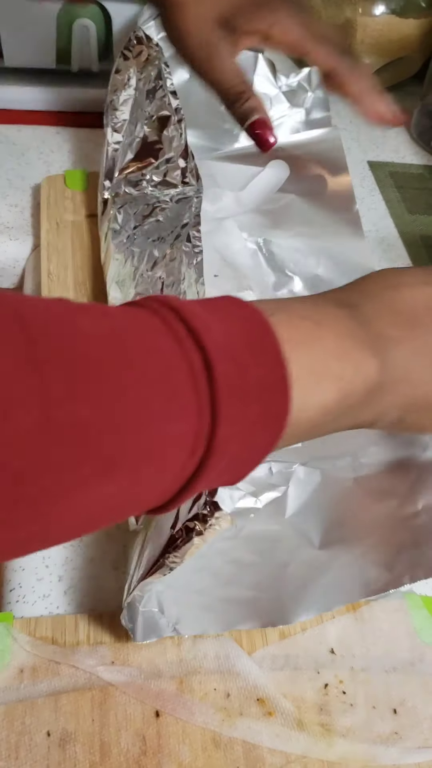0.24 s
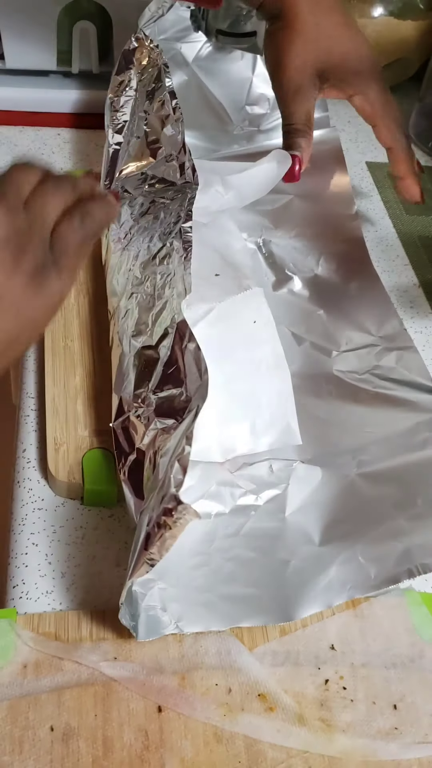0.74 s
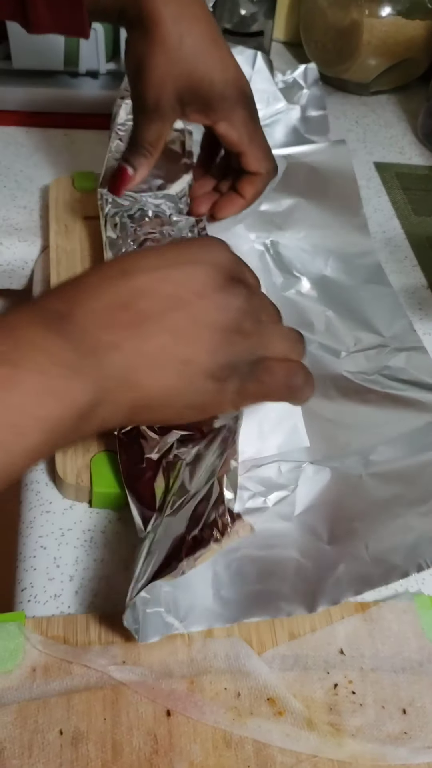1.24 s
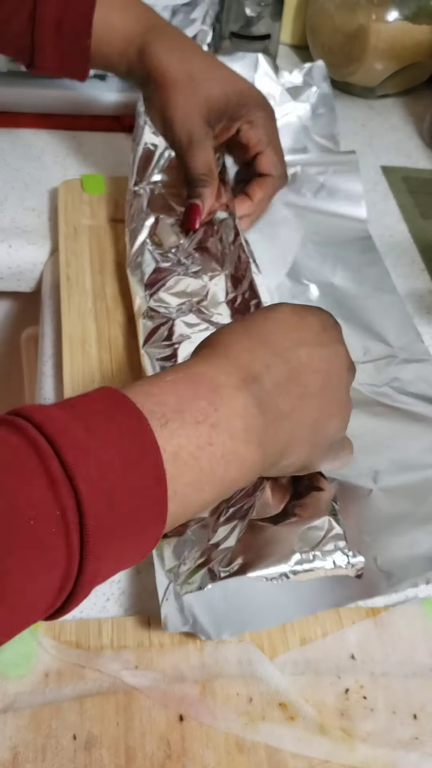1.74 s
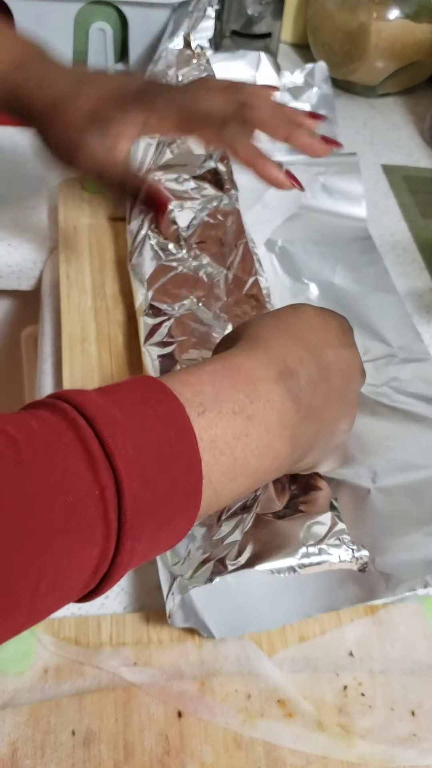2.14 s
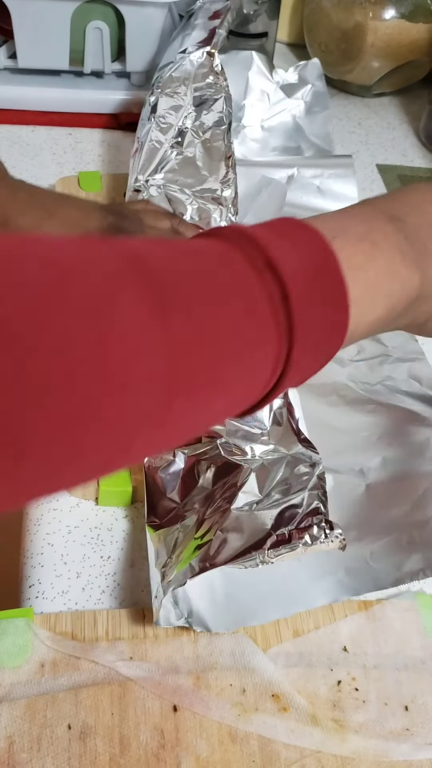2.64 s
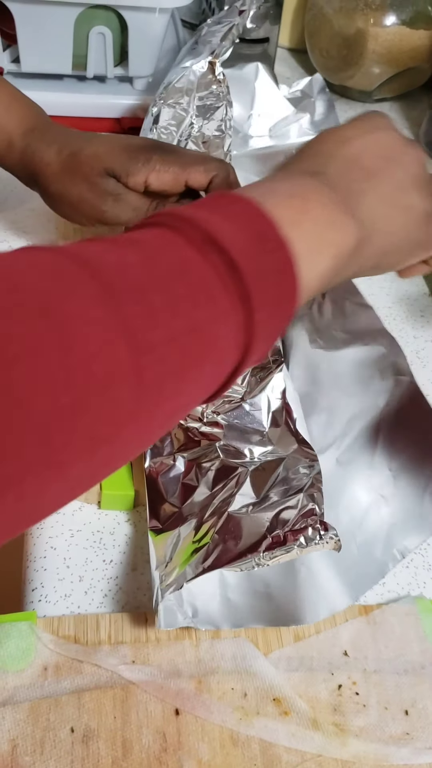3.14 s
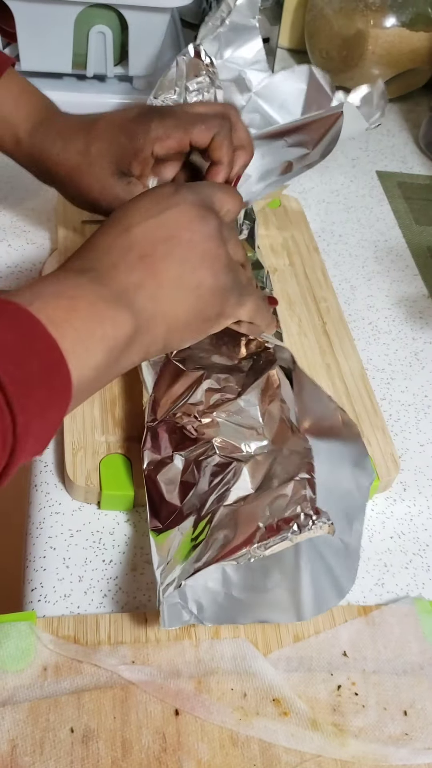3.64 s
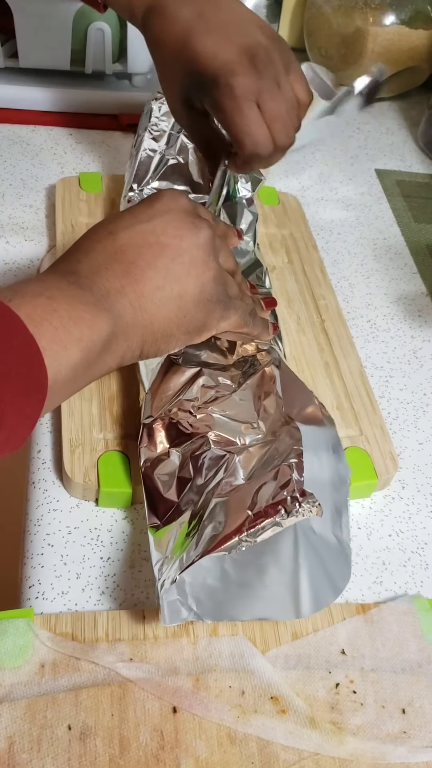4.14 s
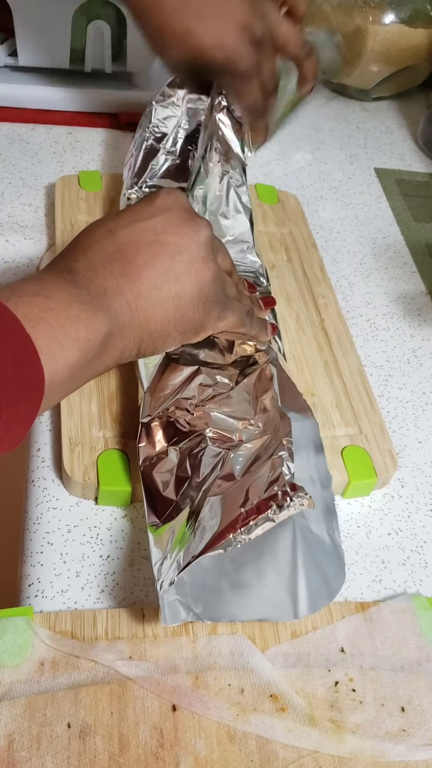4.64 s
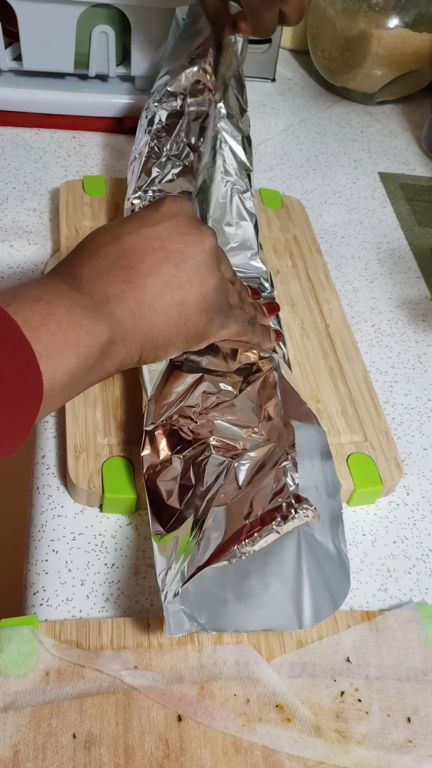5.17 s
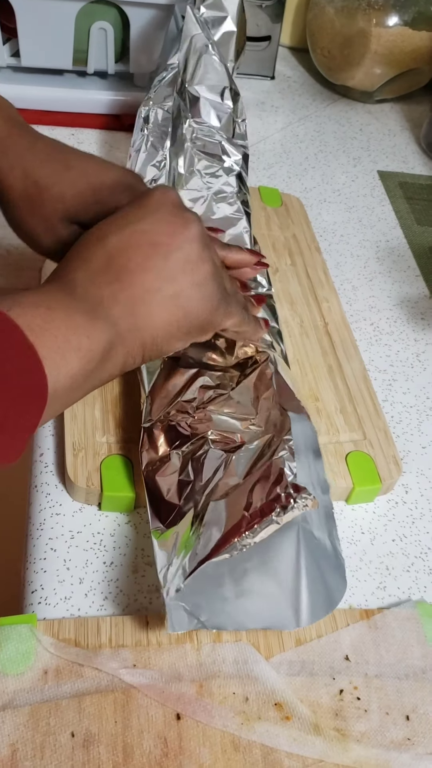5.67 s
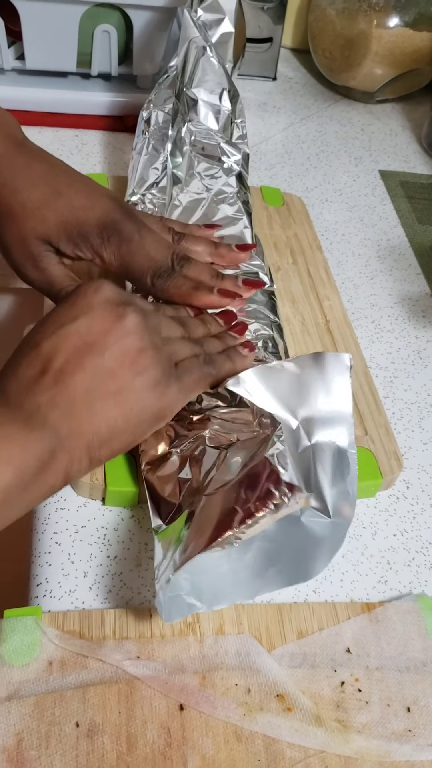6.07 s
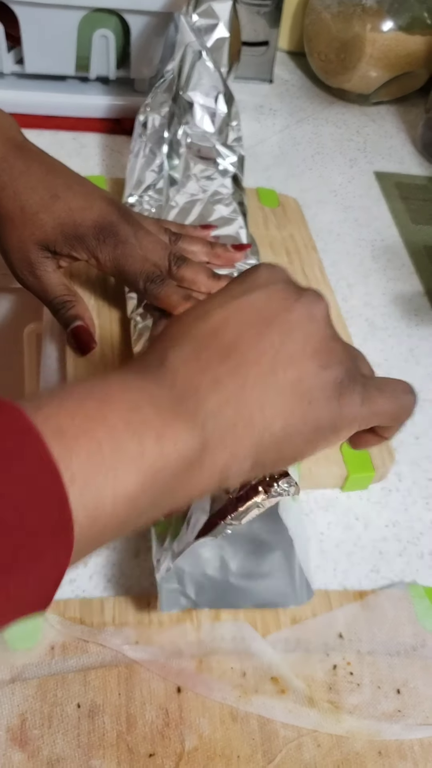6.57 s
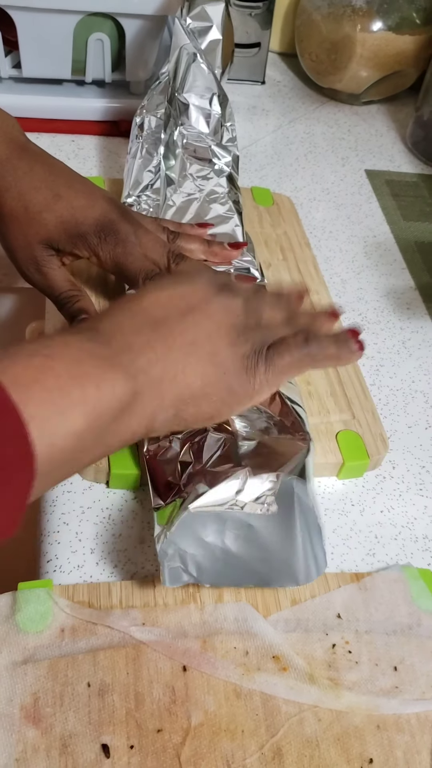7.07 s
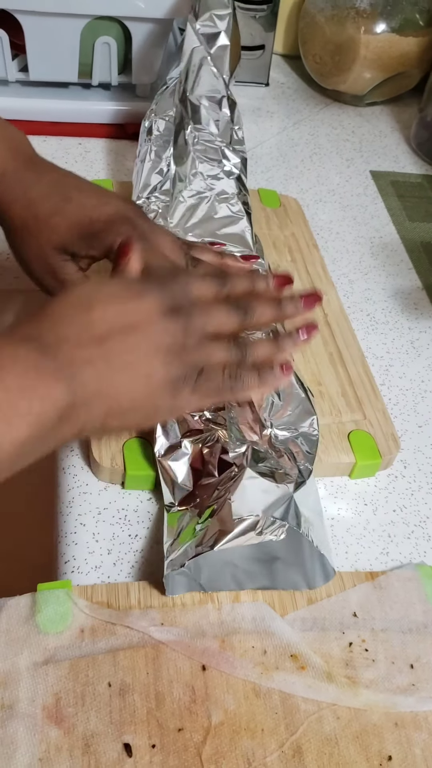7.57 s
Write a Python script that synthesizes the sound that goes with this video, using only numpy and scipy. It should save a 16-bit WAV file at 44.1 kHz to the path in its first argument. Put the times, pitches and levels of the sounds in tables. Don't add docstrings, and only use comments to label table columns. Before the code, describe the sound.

Close, bright foil rustling and snapping, with soft palm thuds underneath, as a parcel is wrapped and pressed shut in a small kitchen.

```python
import sys
import numpy as np
from scipy import signal
from scipy.fft import rfft, irfft, next_fast_len
from scipy.io import wavfile
from scipy.ndimage import uniform_filter1d

SR = 44100
rng = np.random.default_rng(int(sys.argv[2]) if len(sys.argv) > 2 else 0)


def convert_level_to_amplitude(level_db):
    exponent = np.asarray(level_db, float) / 20
    return 10 ** exponent


def store_wav(level_fs):
    pcm = np.round(np.clip(np.atleast_2d(level_fs), -1, 1) * 32767)
    wavfile.write(sys.argv[1], SR, pcm.T.astype(np.int16))


N = 344421

# [start t/s, length t/s, force level/dB, change level/dB,
# sizzle of sharp creases re force level/dB]
FOLD_STROKES = [(0.0, .13, -37, -1, -5), (0.133, 0.029, -33, -1, -6), (0.258, 0.057, -41.5, -4, -17),
                (.47, 0.082, -68, 2, -4), (0.573, 0.012, -45, 3.5, -10), (1.138, 0.086, -50, 14, -11),
                (1.255, 0.12, -29, -2.5, -7), (1.427, .15, -29.5, -0.3, -7), (1.618, .16, -36.5, 8, -7),
                (1.835, 0.12, -38, -4.5, -5), (1.967, .12, -41, 5.5, -9.5), (2.214, 0.026, -44, -5.5, -13),
                (2.388, 0.026, -34.5, 5, -4.5), (2.413, 0.13, -34.5, 0.5, -6.5), (2.63, 0.056, -49, 6, -7),
                (2.788, .06, -40.5, -4, -7), (2.861, 0.11, -42.5, 19, 0.5), (2.968, 0.082, -27, -6, 0.5),
                (3.049, 0.083, -34, 3.5, 4), (3.165, 0.25, -35, 0, -2), (3.471, 0.08, -35, 1.5, -1),
                (3.616, 0.28, -34.5, -5, -7.5), (3.986, 0.12, -41.5, 3, -6.5)]
PRESS_STROKES = [(4.122, 0.2, -29, -8, -0.5), (4.27, 0.046, -31, 2.1, -1.5), (4.37, 0.056, -34.5, 0, -3),
                 (4.445, 0.058, -30.5, -2, -3), (4.52, 0.053, -30.5, -5.5, -3), (4.613, 0.06, -30, -1, -1),
                 (4.729, 0.06, -29.5, 2.5, -2.5), (4.805, 0.047, -28.5, -1.5, -1),
                 (4.878, 0.34, -29, -17, -7), (5.162, 0.083, -39, 7, -6.5), (5.465, 0.059, -55.5, 8.5, -8),
                 (5.572, 0.074, -41.5, 2.5, -15), (5.673, 0.081, -30.5, -1, -3), (5.77, .03, -43, 2, -9),
                 (5.82, 0.014, -33.5, 1.5, -5), (5.885, 0.079, -33.5, 2.5, -5.5), (5.95, 0.086, -34, 1, -6),
                 (6.157, 0.013, -33.5, -2, -14), (6.085, 0.054, -40.5, 0.5, -10), (6.2, 0.11, -42, 4, -7),
                 (6.434, 0.095, -30.5, 0, -6), (6.51, 0.14, -32, 0, -3.3), (6.731, 0.081, -24, -9, -3.5),
                 (6.83, .13, -31, -4, -5.5), (7.153, .07, -32, 8.5, -5.5), (7.23, 0.084, -27, 2, -11.5),
                 (7.3, 0.15, -32.5, 2.5, -5.5), (7.501, 0.052, -41.5, 9.5, -7),
                 (7.64, 0.059, -42.5, 2.5, -4), (7.715, 0.11, -27, -2, -6.5)]
# [t/s, level/dB]
PALM_WEIGHT = [(0.0, -1.5), (.4, 0), (1.1, -1.5), (1.5, -1), (1.9, 1), (2.5, -2), (2.7, -4.5),
               (3.101, -6.5), (3.4, -1), (3.85, -3), (4.3, 3), (4.6, 0), (4.85, 3.5), (5.1, 2.5), (5.4, -2),
               (5.901, -1), (6.3, -3), (6.55, -1), (6.8, 0), (7.1, -6.5), (7.5, -0.5), (7.81, -1)]
# [t/s, level below FOLD_HZ/dB]
FOLD_BREADTH = [
    (0.0, -5),
    (1.2, 1),
    (2.5, 1),
    (3.0, -5.5),
    (4.2, -1),
    (5.0, 0.5),
    (6.0, 3.5),
    (6.6, 1.5),
    (7.3, 2),
    (7.81, 3.5),
]
# [t/s, left-right level/dB]
HAND_PLACE = [(0.0, 0), (.8, 2), (1.2, 0.3), (1.8, 0.7), (2.3, 0.7), (2.7, 0.5), (3.2, -0.5), (3.7, 0),
              (4.2, 0), (4.7, 0), (5.3, 0.5), (5.8, -0.5), (6.2, 0), (6.7, -1.5), (7.2, -0.5), (7.81, -.5)]
# [t/s, peak level/dB, patch f/Hz, sizzle level/dB]
LARGE_BUCKLES = [(0.127, -22, 2100, -10), (1.3638, -13, 3830, -10), (1.4363, -10.5, 4520, -17),
                 (1.652, -9.5, 1740, -15.5), (1.704, -8, 2400, -20), (1.912, -16, 2520, -26),
                 (2.056, -16, 3090, -9), (2.893, -9, 2750, 20), (2.9475, -7.5, 2580, -8),
                 (3.051, -11, 2470, -12), (3.0834, -10, 5460, -35), (3.121, -10, 6250, -24),
                 (3.2414, -9.5, 2550, -11), (3.272, -9, 3950, -13), (3.3255, -14.5, 2870, -15),
                 (3.3923, -8, 2700, -15), (3.4898, -5, 2750, -9.5), (3.6107, -12, 3450, -17),
                 (3.6844, -18, 2070, -10), (3.8541, -11.5, 2830, -15), (4.3084, -12, 3830, -27),
                 (4.4483, -12, 2710, -15), (4.609, -8, 2220, -17), (5.0425, -11, 2840, -16),
                 (5.8106, -16, 3940, -7), (5.881, -10, 4090, -14), (6.8312, -9.5, 6350, -17),
                 (7.2126, -9, 1920, -6), (7.391, -6, 3970, -15), (7.7805, -4.5, 2880, -15.5)]
CREASE_BUCKLES = [(0.327, -26.5, 3000, -20), (0.594, -25, 2500, -18), (0.618, -37, 2500, -23),
                  (1.2655, -16, 3000, -4), (1.6363, -17, 2220, -15), (1.774, -7, 2000, -19.5),
                  (2.3721, -15.5, 2870, -11), (2.4844, -13, 1900, -17), (3.4622, -19, 3600, -6),
                  (3.538, -16, 3520, -19), (3.633, -17, 2500, -13), (3.7246, -16, 2440, -10),
                  (3.8898, -18.5, 2540, -23), (4.254, -17, 2540, -18), (4.329, -10.5, 1000, -23),
                  (4.3786, -13, 3060, -15), (4.526, -7.5, 1800, -18), (4.64, -7, 2300, -13),
                  (4.7103, -11, 2950, -18), (4.807, -10, 2300, -19), (4.877, -7.5, 2680, -14),
                  (5.2448, -24.5, 1680, -15), (5.6452, -33, 2620, -18), (5.679, -16, 3000, -15),
                  (5.822, -14.5, 3500, -5), (5.958, -19, 4030, -19), (6.031, -30, 3500, -17),
                  (6.439, -6.5, 3800, -14), (6.532, -8, 8600, -11), (6.619, -13, 3500, -21),
                  (6.7175, -5, 2000, -9), (6.75, -14, 4500, -15), (2.6, -22, 4020, -19),
                  (2.785, -21, 3800, -6), (3.09, -10, 4500, -13), (7.42, -11, 3500, -9)]
LANDING_CRACKS = [(0.247, -20.5, 2560, -15), (0.542, -34, 2570, -32), (1.095, -40.5, 3170, -38),
                  (1.1203, -25, 1270, -39), (1.136, -24, 1200, -30), (1.1752, -18.5, 1960, -20),
                  (1.241, -10.5, 2200, -42), (2.36, -21, 2570, -8), (2.735, -21.5, 3740, -20),
                  (2.774, -20, 3810, 1), (2.8637, -17, 4800, -33), (3.9603, -19, 4810, -15),
                  (4.0056, -18, 4400, -21), (4.0572, -21, 4850, -9), (4.0886, -11, 4500, -13),
                  (4.116, -20, 4690, -19), (5.122, -16.5, 3280, -16), (5.435, -23, 6160, -21),
                  (5.5414, -18.5, 3420, -21), (5.5818, -19, 1980, -21), (5.6617, -31, 4130, -18),
                  (6.1436, -11.5, 1100, -21), (6.406, -19, 3570, -19), (6.421, -11.5, 4170, -8),
                  (6.699, -10, 4700, -13), (6.714, -1.5, 1350, -20.5), (7.1183, -24.5, 2000, -24),
                  (7.139, -27.5, 4010, -30.5), (7.1635, -16, 4700, -26), (7.697, -19, 2890, -8),
                  (7.7046, -9, 1100, -15)]
SETTLING_TICKS = [(0.2744, -16, 3810, -14), (0.4205, -27, 2940, -27), (0.467, -44.5, 1740, -27),
                  (1.1435, -17, 3520, -27), (0.8316, -38, 2420, -42), (0.9415, -34.5, 3200, -21),
                  (1.0379, -47, 2210, -29), (2.113, -15, 2500, -22), (2.1953, -31, 2580, -27),
                  (2.21, -20.5, 2940, -2), (2.26, -24, 1940, -20), (2.316, -27.5, 2550, -33),
                  (2.585, -19, 4000, -24), (5.346, -20, 4620, -18), (5.375, -26, 4150, -15),
                  (5.4636, -28, 4060, -5), (5.5114, -41, 4320, -33), (6.2103, -14.5, 1130, -28),
                  (6.2426, -20, 3390, -19), (6.288, -20, 3750, -8), (6.9377, -9, 2880, -15),
                  (7.5246, -21, 3570, 5), (7.644, -24, 1600, -36)]
# [t/s, peak level/dB, f/Hz]
PALM_BUMPS = [(0.102, -33, 109), (0.556, -43, 392), (1.165, -36, 663), (2.386, -33, 127), (2.401, -36, 146),
              (3.118, -30, 265), (3.234, -34.5, 210), (3.48, -36, 208), (4.084, -38, 670),
              (4.253, -36, 328), (4.317, -25.5, 276), (4.515, -35.5, 113), (4.61, -30, 126),
              (4.872, -34, 181), (5.039, -35, 371), (5.657, -38, 652), (5.873, -41, 690), (5.929, -34, 267),
              (6.506, -28.5, 272), (6.59, -32.5, 168), (6.11, -35.5, 266), (6.169, -44, 130),
              (5.15, -46, 160), (3.04, -39, 179), (3.3, -37.5, 293), (3.8, -38, 310), (7.3, -38, 190),
              (7.56, -43, 171), (2.081, -45, 150), (6.36, -45, 283), (6.708, -27.5, 178), (6.76, -37, 120),
              (6.921, -34, 131), (7.195, -29, 251), (7.383, -39, 311), (7.705, -38, 139)]
# [t/s, level/dB]
COUNTER_LEANS = [(0.0, -53), (.36, -60), (.61, -63), (1.24, -52.5), (1.55, -58), (2.06, -61), (2.46, -60),
                 (2.98, -60), (3.65, -64), (4.26, -68), (4.55, -59), (4.8, -55), (5.61, -58), (6.25, -62),
                 (6.75, -55), (7.2, -55.5), (7.75, -66)]
# [f/Hz, level per Hz/dB]
FOIL_SPECTRUM = [(56, -61), (95, -5), (234, -10), (271, -4.5), (426, -6.5), (712, -3), (863, -6), (961, -5),
                 (3950, -0.5), (7840, -3.5), (8730, -1.5), (10400, -9), (11800, -3.5), (14900, -9),
                 (15900, -5)]
# [f/Hz, width/octaves, level/dB]
BOARD_ECHO = [(560, 0.31, -2.5), (735, 0.093, 3), (1378, 0.12, -1), (2650, 0.075, 1), (3200, 0.09, 0)]
# [f/Hz, left-right level/dB]
PORT_BALANCE = [(60, 13.5), (270, 0.5), (500, 1), (1200, 2), (2500, 4.5), (4500, 0.5), (6500, 1),
                (8500, -5), (12000, -9), (15500, -12.5)]
# [f/Hz, likeness/1]
PORT_LIKENESS = [(60, .92), (110, .995), (190, .985), (300, .8), (520, .64), (1000, .28), (2000, .1),
                 (4000, 0)]
# [f/Hz, t60/s]
KITCHEN_T60 = [(100, 0.17), (500, 0.38), (2000, 0.62), (6000, 0.17), (15000, 0.24)]
# [f/Hz, level per Hz/dB]
AIR_SPECTRUM = [(18, -32), (30, 10), (81, 14), (737, -30), (1100, 1), (3560, -6), (7500, -6.5), (9500, -35),
                (12000, -23), (15900, -15)]

AIR_DB = -73
PALM_HZ, SIZZLE_HZ, FOLD_HZ = 750, 6200, 1500
GRIP_S, LET_GO_DB_PER_S, SIZZLE_LET_GO_DB_PER_S = 0.043, 184, 302
PALM_DB, PALM_FOLLOWS, PALM_LET_GO_DB_PER_S = -50.5, 0.85, 157
REST_DB = -72
LEAN_S, SETTLE_DB_PER_S = 0.13, 53
TOP_HZ = 15830


def at_hz(points, hz):
    points_hz, values = np.transpose(points)
    return np.interp(np.log(hz + 1), np.log(points_hz), values)


def at_time(points):
    return np.interp(np.arange(N) / SR, *np.transpose(points))


def rms_one(x):
    return x / np.sqrt(np.mean(x ** 2) + 1e-20)


def drift(rate_hz):
    pole = np.exp(-80 * np.pi * rate_hz / SR)
    noise = rng.standard_normal(N // 40 + 2002)
    slow = signal.lfilter([1], [1, -2 * pole, pole * pole], noise)[2000:]
    return np.interp(np.arange(N) / 40, np.arange(len(slow)), rms_one(slow))


def port_noise(spectrum, count, size):
    hz = np.fft.rfftfreq(size, 1 / SR)
    mid, side = rfft(rng.standard_normal((count, 2, size))).transpose(1, 0, 2)[:, :, None]
    alike = np.clip(at_hz(PORT_LIKENESS, hz), 0, 1)
    sign = np.array([[1], [-1]])
    colour = convert_level_to_amplitude(at_hz(spectrum, hz) + sign * at_hz(PORT_BALANCE, hz) / 2)
    return hz, colour * (np.sqrt(1 + alike) * mid + np.sqrt(1 - alike) * side * sign)


def flat_noise(size):
    hz, noise = port_noise([(20, 0), (20000, 0)], 1, size)
    return hz, noise[0]


def split(hz):
    palm = 1 / (1 + (hz / PALM_HZ) ** 6)
    sizzle = 1 - 1 / (1 + (hz / SIZZLE_HZ) ** 7)
    return palm, 1 - palm - sizzle, sizzle


def bell(hz, centre_hz, octaves):
    return np.exp(-.5 * (np.log2((hz + 1) / centre_hz) / octaves) ** 2)


def hump(hz, centre_hz, octaves, lift_db):
    return convert_level_to_amplitude(lift_db * bell(hz, centre_hz, octaves))


def board(hz):
    return np.prod([hump(hz, centre_hz, octaves, lift_db) for centre_hz, octaves, lift_db in BOARD_ECHO], axis=0)


def shudder(size, rise_s, crack_t60, ring_t60, ring_db):
    t = np.arange(size) / SR
    crack = convert_level_to_amplitude(-60 * t / crack_t60)
    ring = convert_level_to_amplitude(ring_db - 60 * t / ring_t60)
    return (1 - np.exp(-t / rise_s)) * (crack + ring)


def ringing(hz, modes, size, rise_s, crack_t60, ring_t60, ring_db, sizzle_share):
    sizzle = split(hz)[2]
    broad = irfft(modes * (1 - sizzle), size) * shudder(size, rise_s, crack_t60, ring_t60, ring_db)
    sharp = irfft(modes * sizzle, size) * shudder(size, rise_s, crack_t60, ring_t60 * sizzle_share, ring_db)
    return broad + sharp


def place(s, waves):
    size = waves.shape[-1]
    out = np.zeros((2, N + size))
    for start, wave in zip((s.ravel() * SR).astype(int), waves):
        out[:, start:start + size] += wave
    return out[:, :N]


def swell(start_s, length_s, top_db, change_db, rise_s, fall_db_per_s):
    t = np.arange(0, N + 32, 32) / SR - start_s[:, None]
    length_s = np.maximum(length_s, .004)[:, None]
    build_db = 20 * np.log10(np.clip(1 + t / rise_s, 1e-6, 1))
    held_db = top_db[:, None] + change_db[:, None] * np.clip(t / length_s, 0, 1)
    db = held_db + build_db - fall_db_per_s * np.maximum(t - length_s, 0)
    return np.repeat(db.max(axis=0), 32)[:N]


def hands():
    start_s, length_s, force_db, change_db, sharp_db = np.transpose(FOLD_STROKES + PRESS_STROKES)
    level_db = swell(start_s, length_s, force_db, change_db, GRIP_S, LET_GO_DB_PER_S)
    sizzle_db = swell(start_s, length_s, force_db + sharp_db, change_db, GRIP_S, SIZZLE_LET_GO_DB_PER_S)
    thud_db = swell(start_s, length_s, force_db, change_db, GRIP_S, PALM_LET_GO_DB_PER_S)
    swing_db = thud_db - np.mean(force_db)
    palm_db = PALM_DB + PALM_FOLLOWS * swing_db + at_time(PALM_WEIGHT)
    return np.maximum(level_db, REST_DB), np.maximum(sizzle_db, REST_DB - 13.0), np.maximum(palm_db, REST_DB - 15.0)


def patches(count, size):
    hz, modes = port_noise(FOIL_SPECTRUM, count, size)
    pitch_hz = np.geomspace(900, 12000, count)[:, None, None]
    modes = modes * board(hz) * hump(hz, pitch_hz, octaves=.16, lift_db=8.5)
    return ringing(hz, modes, size, rise_s=0.00037, crack_t60=0.0051, ring_t60=0.11, ring_db=1.5, sizzle_share=1.0)


def rattle(snaps, dealt, count, size, spells=10):
    step = -(-N // spells)
    long = next_fast_len(step + size)
    out = np.zeros((2, N + long))
    for start in range(0, N, step):
        spell = slice(start, start + step)
        hits = snaps[spell] * (dealt[spell] == np.arange(count)[:, None])
        shaken = rfft(hits, long)[:, None] * rfft(patches(count, size), long)
        out[:, start:start + long] += irfft(np.sum(shaken, axis=0), long)
    return out[:, :N]


def crinkle(per_s=1100.0, spread_db=3.0, clump_db=3.0, roam=.3, reach=.35, steady_s=0.09, count=22, size=4096):
    level_db, sizzle_db, palm_db = hands()
    born = rng.random(N) < per_s * convert_level_to_amplitude(clump_db * drift(25.0)) / SR
    height = convert_level_to_amplitude(spread_db * np.minimum(rng.exponential(1, N), 4))
    snaps = born * height * rng.choice([-1, 1], N)
    span = int(steady_s * SR)
    power = uniform_filter1d(uniform_filter1d(snaps ** 2, span), span)
    snaps = snaps / np.sqrt(power + 0.0012)
    dealt = (count * (roam * drift(8.0) + reach * rng.random(N))).astype(int) % count
    long = next_fast_len(N)
    sheet = rfft(rattle(snaps, dealt, count, size), long)
    shares = split(np.fft.rfftfreq(long, 1 / SR))
    palm, body, sizzle = [rms_one(irfft(sheet * share, long)[:, :N]) for share in shares]
    folds = signal.lfilter(*signal.butter(2, FOLD_HZ, fs=SR), body)
    body = body + (convert_level_to_amplitude(at_time(FOLD_BREADTH)) - 1) * folds
    return convert_level_to_amplitude(level_db + 0.44) * body + convert_level_to_amplitude(sizzle_db + 3.0) * sizzle + convert_level_to_amplitude(palm_db + 1.13 * drift(2.9)) * palm


def shake(centre_hz=62.6, octaves=0.28):
    size = next_fast_len(N)
    hz, noise = flat_noise(size)
    s, top_db = np.transpose(COUNTER_LEANS)
    level_db = swell(s, 0 * s, top_db, 0 * s, LEAN_S, SETTLE_DB_PER_S)
    return convert_level_to_amplitude(level_db) * rms_one(irfft(noise * bell(hz, centre_hz, octaves), size)[:, :N])


def hush():
    size = next_fast_len(N)
    noise = port_noise(AIR_SPECTRUM, 1, size)[1][0]
    return convert_level_to_amplitude(AIR_DB) * rms_one(irfft(noise, size)[:, :N])


def bumps(t60=0.13, soft_s=0.0036, size=6000):
    s, peak_db, pitch_hz = np.transpose(PALM_BUMPS)[:, :, None]
    t = np.arange(size) / SR
    wobble_rad = np.cumsum(rng.standard_normal((len(s), size)), axis=1) * 0.057
    decay = convert_level_to_amplitude(peak_db - 3.0 - 60 * t / t60) * (1 - np.exp(-t / soft_s))
    waves = decay * np.sin(2 * np.pi * pitch_hz * t + wobble_rad)
    return place(s, waves[:, None])


def buckles(size=4096):
    moving = LARGE_BUCKLES + CREASE_BUCKLES
    events = moving + LANDING_CRACKS + SETTLING_TICKS
    s, peak_db, pitch_hz, sizzle_db = np.transpose(events)[:, :, None, None]
    hz, modes = port_noise(FOIL_SPECTRUM, len(s), size)
    neighbour_hz = pitch_hz * 2 ** rng.uniform(-1.2, 1.2, s.shape)
    modes = modes * hump(hz, neighbour_hz, octaves=0.11, lift_db=6.5)
    modes = modes * board(hz) * hump(hz, pitch_hz, octaves=0.21, lift_db=6.0)
    modes = modes * convert_level_to_amplitude((sizzle_db + 16.0) * split(hz)[2])
    kinds = [len(moving), len(LANDING_CRACKS), len(SETTLING_TICKS)]
    ring_db = np.repeat([-3.0, -3.0, -11.0], kinds)[:, None, None]
    rise_s = np.repeat([.0025, .0012, .0004], kinds)[:, None, None]
    modes = modes / irfft(modes, size).std(axis=(1, 2), keepdims=True)
    waves = ringing(hz, modes, size, rise_s, crack_t60=0.014, ring_t60=0.2, ring_db=ring_db, sizzle_share=0.91)
    return place(s, waves * convert_level_to_amplitude(peak_db - 13.5))


def kitchen(x, wet_db=-13.0, size=20000):
    hz, noise = flat_noise(size)
    t = np.arange(size) / SR
    tail = 0
    for centre_hz in 62.5 * 2 ** np.arange(9):
        share = np.clip(1 - abs(np.log2((hz + 1) / centre_hz)), 0, 1)
        tail = tail + irfft(noise * share, size) * convert_level_to_amplitude(-60 * t / at_hz(KITCHEN_T60, centre_hz))
    tail = tail * np.clip(t / 0.018, 0, 1)
    tail = convert_level_to_amplitude(wet_db) * tail / np.sqrt(np.sum(tail ** 2) / 2)
    return signal.fftconvolve(x.mean(axis=0, keepdims=True), tail, axes=1)[:, :N]


def scene():
    pan = convert_level_to_amplitude(at_time(HAND_PLACE) * np.array([[.5], [-.5]]))
    near = (crinkle() + buckles()) * pan + bumps()
    return near + kitchen(near) + shake() + hush()


def band_limit(x):
    return signal.sosfilt(signal.butter(12, 16850, fs=SR, output="sos"), x)


def record(dry, spacing_hz=98.0):
    mid, side = (dry[0] + dry[1]) / 2, (dry[0] - dry[1]) / 2
    side = signal.lfilter(*signal.butter(1, spacing_hz, "high", fs=SR), side)
    top_cut = signal.ellip(10, .3, 75, TOP_HZ, fs=SR, output="sos")
    mix = signal.sosfilt(top_cut, [mid + side, mid - side])
    return band_limit(mix)


dry = scene()
out = record(dry)
store_wav(out)
```